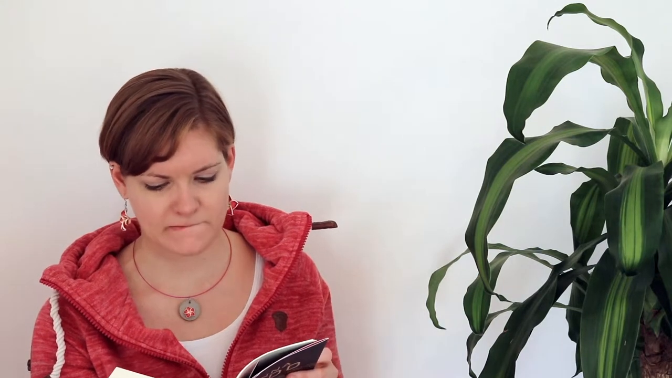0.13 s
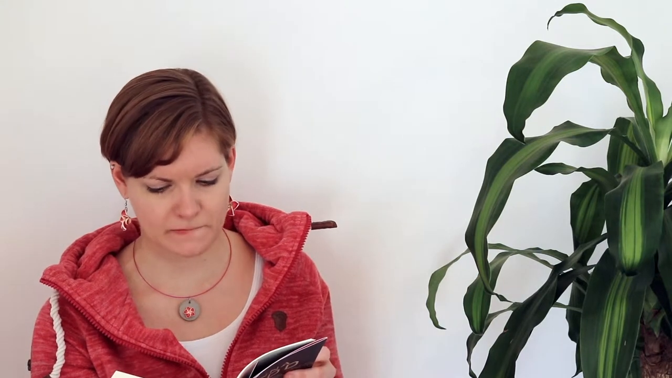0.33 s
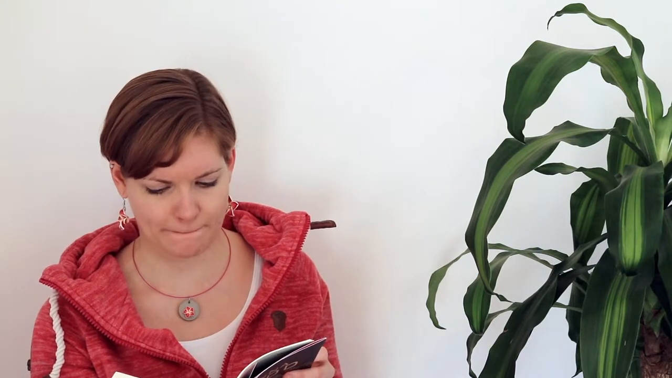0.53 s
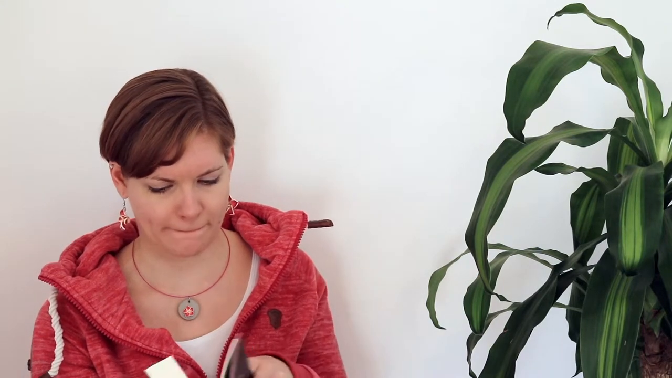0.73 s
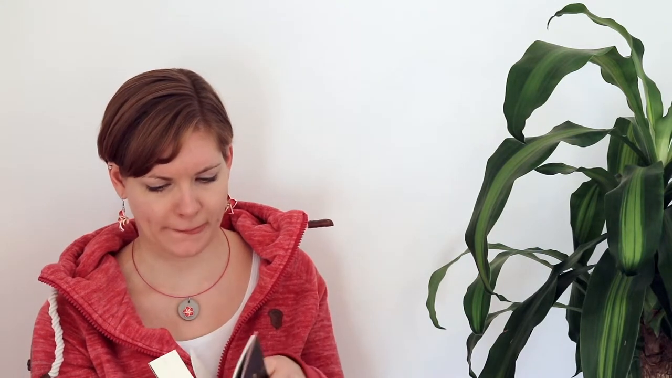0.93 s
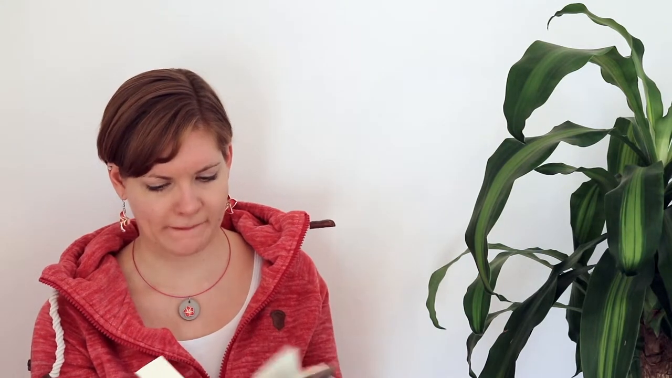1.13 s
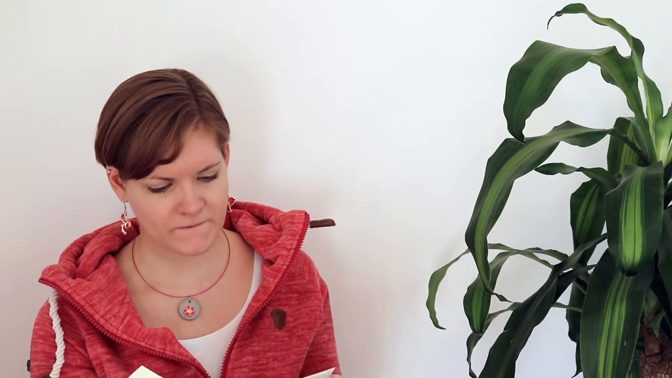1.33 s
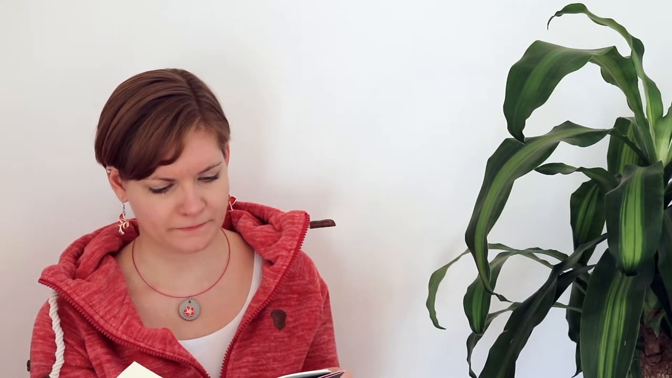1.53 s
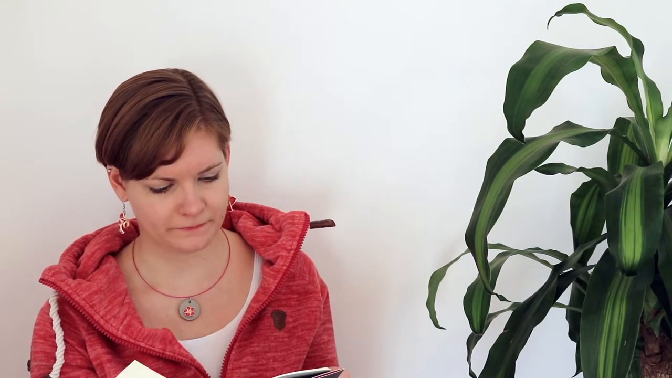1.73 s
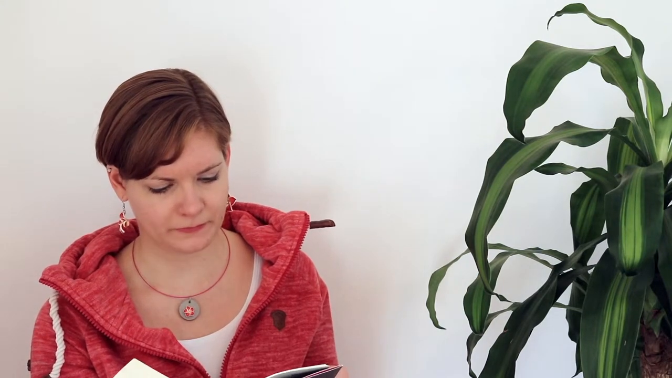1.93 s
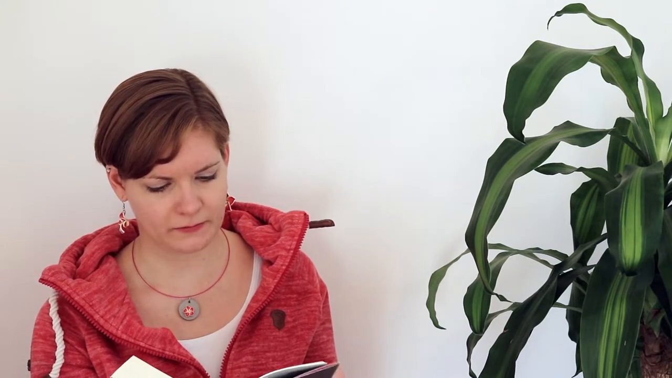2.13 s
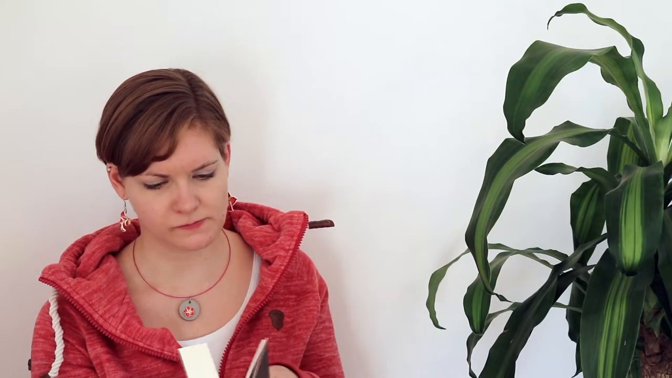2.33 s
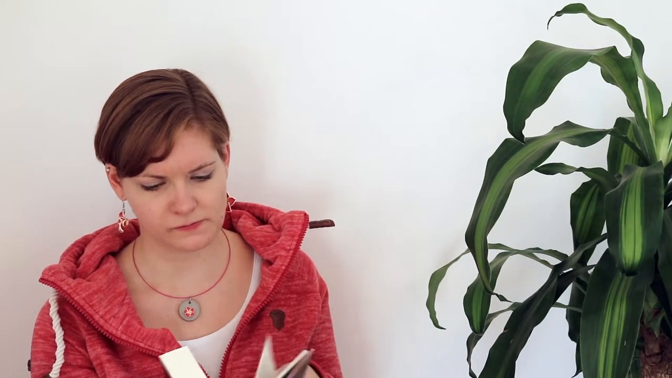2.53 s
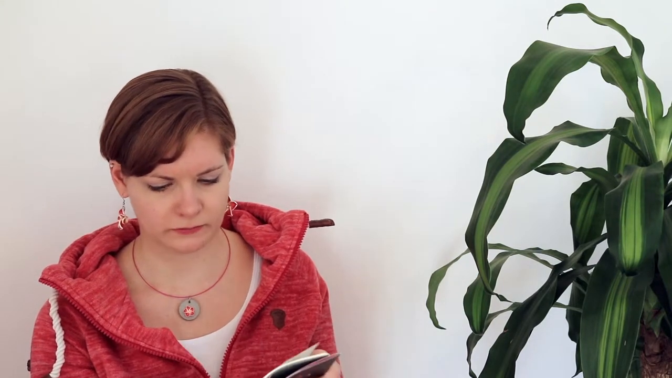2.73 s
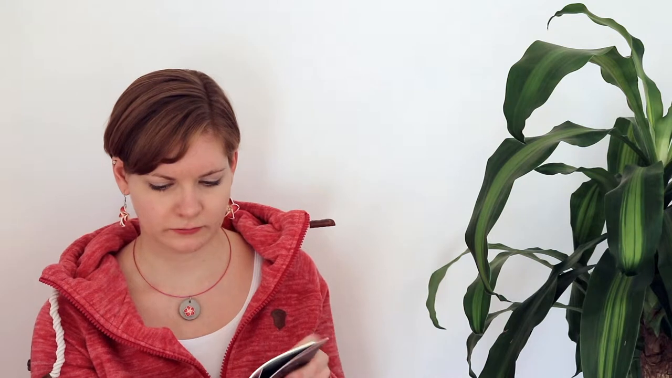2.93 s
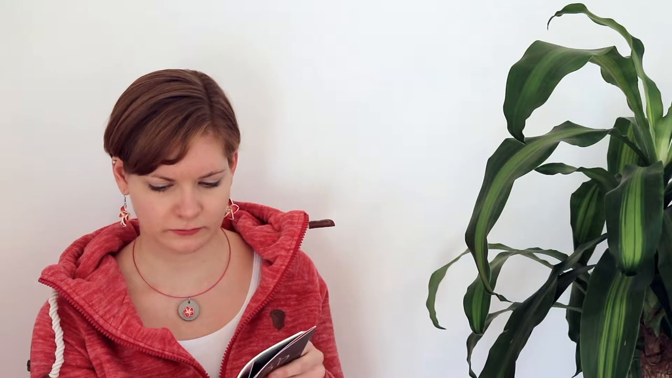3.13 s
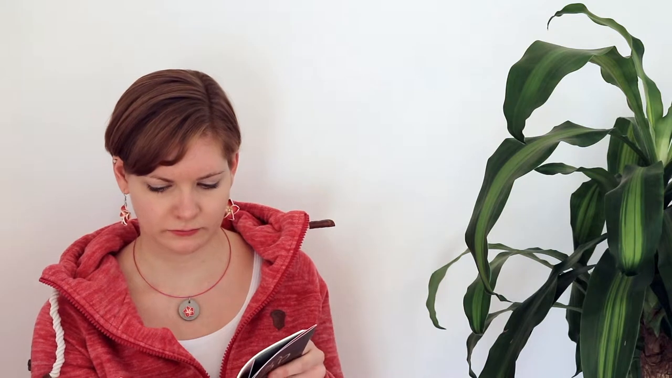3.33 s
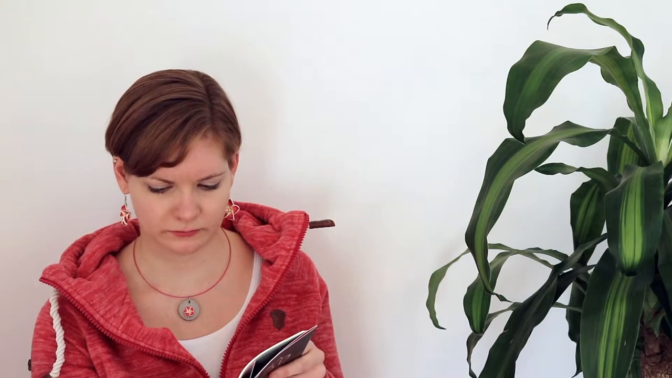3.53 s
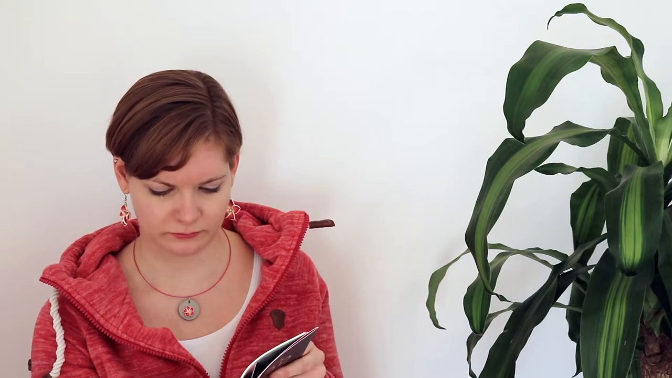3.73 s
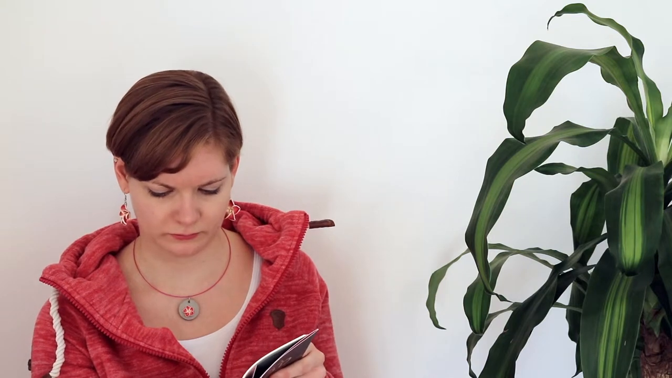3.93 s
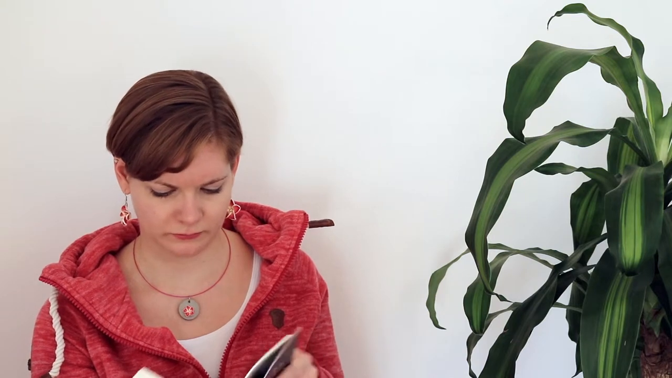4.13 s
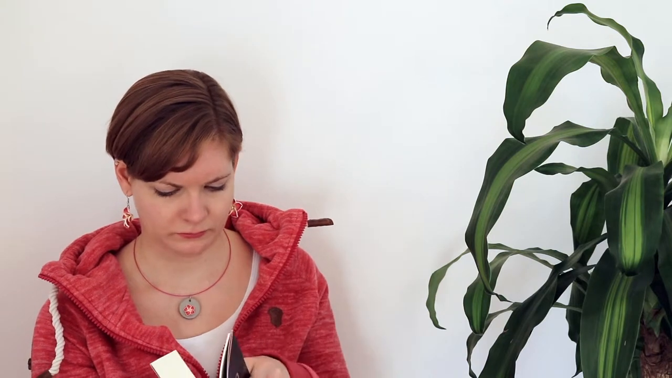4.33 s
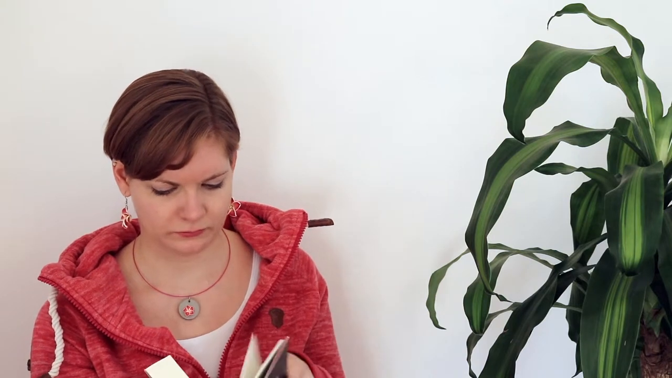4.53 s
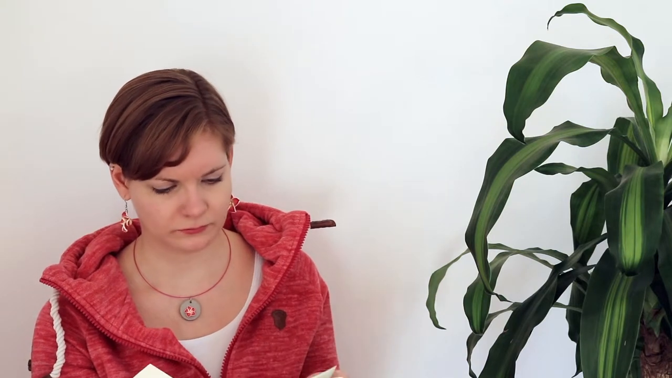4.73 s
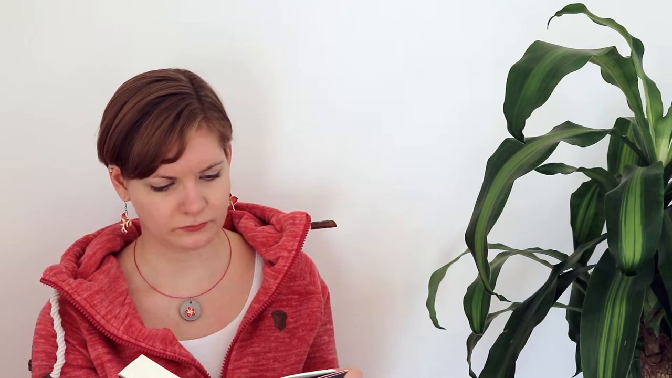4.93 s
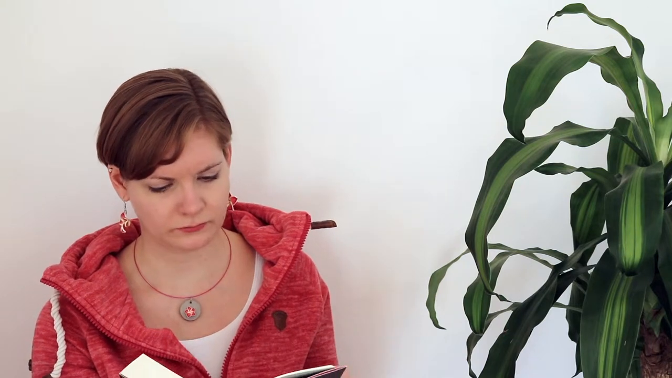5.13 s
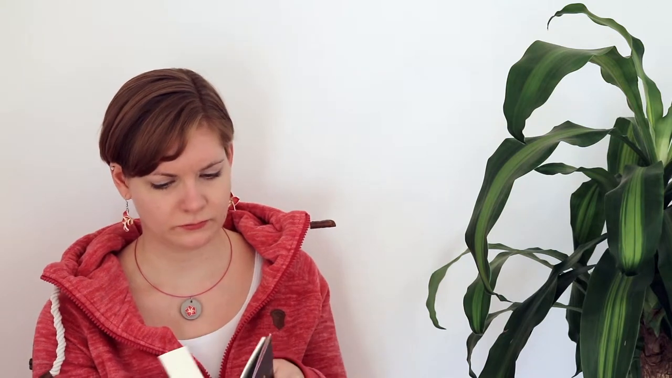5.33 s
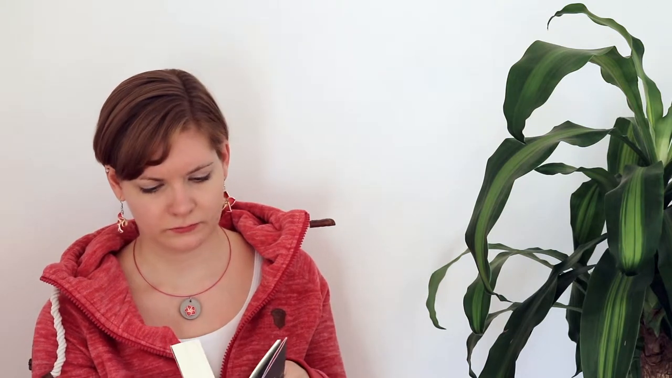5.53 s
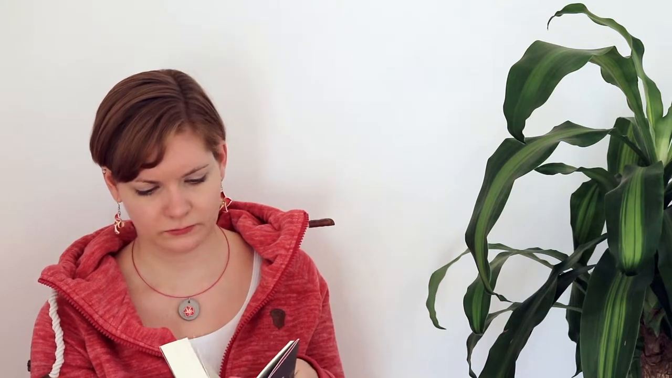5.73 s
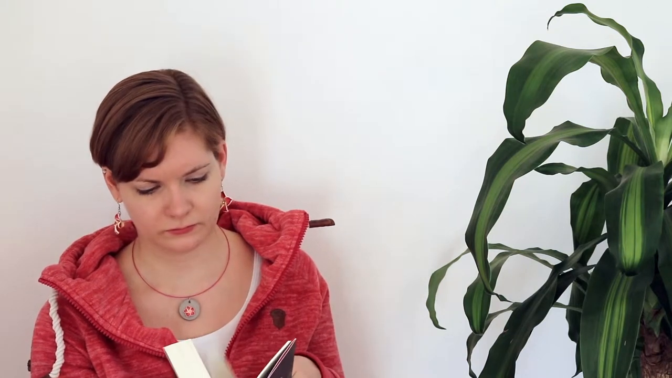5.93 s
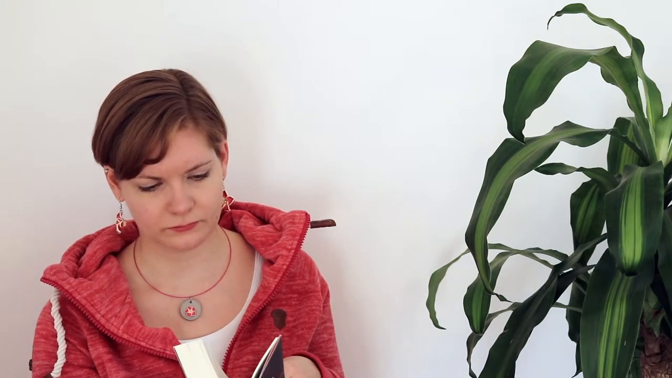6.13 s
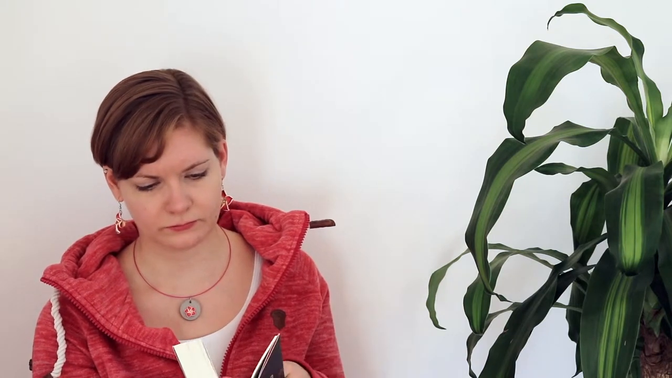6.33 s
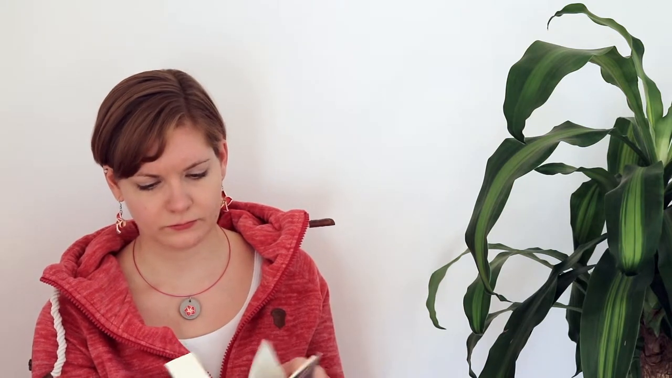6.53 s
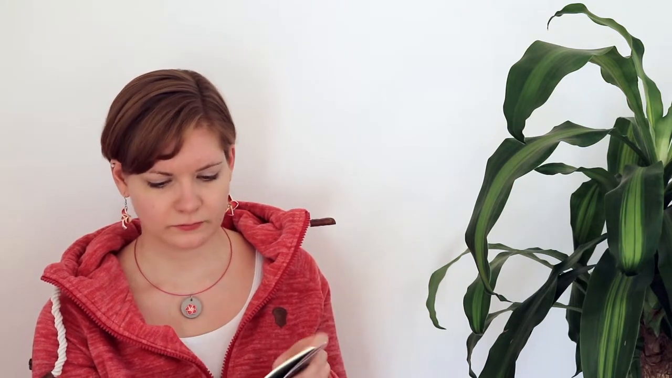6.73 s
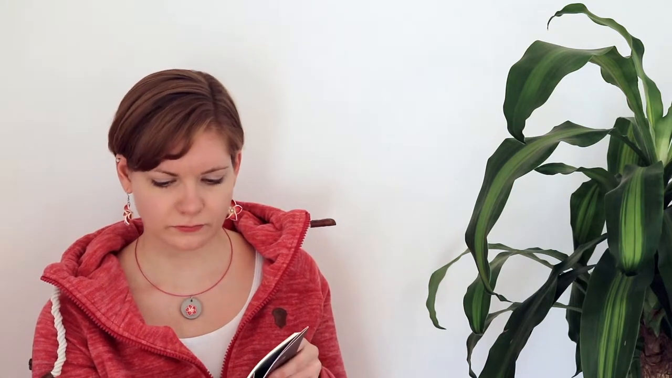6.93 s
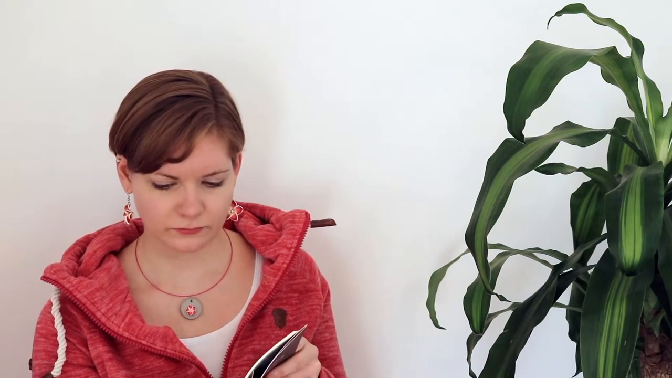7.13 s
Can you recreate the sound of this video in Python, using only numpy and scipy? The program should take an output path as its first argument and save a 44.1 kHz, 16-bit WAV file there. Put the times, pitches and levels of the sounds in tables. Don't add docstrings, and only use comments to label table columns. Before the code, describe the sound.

A small quiet room, with a paperback handled about a metre from a stereo microphone and leaning slightly left. Faint hiss alone at first, then a light flick and brush around 0.7 seconds. From 1.0 to 1.6 a busy bout of crisp edge flicks, dry scraping and thin airy swishes. After a near-silent gap, a faint brush at 2.2 leads to a denser, louder flurry from 2.5 to 2.95, ending as pages settle brightly. A pause follows until soft drags at 4.2, then stronger rustles and a long airy swish between 4.5 and 4.9. A small light rustle comes at 5.3. Near 6.03 the stiff cover gives one sharp, dry snap with a brief woody ring, followed by small flicks. A final crisp flurry at 6.5 to 6.8 ends in a swish. Dull taps lie faintly beneath; hiss lifts with each movement and sinks slowly until about 7.1.

```python
import sys
import numpy as np
from scipy import signal
from scipy.fft import rfft, irfft, next_fast_len
from scipy.io import wavfile
from scipy.ndimage import uniform_filter1d

SR = 44100
rng = np.random.default_rng(int(sys.argv[2]) if len(sys.argv) > 2 else 0)


def elevation(decibels):
    levels = np.asarray(decibels, float)
    return 10 ** (levels / 20)


def digitize_waveform(pressure):
    field = np.atleast_2d(pressure).T
    bounded = np.clip(field, -1, 1)
    quanta = np.round(bounded * 32767).astype(np.int16)
    wavfile.write(sys.argv[1], SR, quanta)


N = 315742

# low_hz, high_hz
RUSTLE_BANDS = [
    (1500, 4100),
    (4500, 7500),
    (7500, 11000),
    (11000, 15900),
    (420, 1100),
]
# start_s, hold_s, scrape_db, body_over_scrape_db, air_over_scrape_db
CATCHES = [(0.671, .005, -74, 9.5, -7), (1.066, 0.0048, -53.5, -16, 0), (1.468, .016, -53.5, -4, 8),
           (1.544, .002, -56.5, -8, -3), (2.275, .03, -59, -4.5, -3.5), (2.535, 0.0057, -55, -8, -10),
           (2.564, 0.021, -42.5, -5, -8), (2.677, .025, -42, -8.5, -7), (2.844, .006, -63.5, 8.5, -14),
           (4.506, 0.0057, -62, -2, -6), (4.543, .018, -42, -9, -5.5), (4.753, .004, -44.5, -2, -2),
           (5.296, .012, -62.5, 0, 9.5), (5.343, .008, -61.5, -1.5, -10), (5.811, 0.018, -80, 12, -12),
           (6.033, .004, -51.5, 12, -45), (6.051, .002, -49, 3.5, -14.5), (6.158, .006, -50.5, -5, -5.5),
           (6.497, .006, -49, -20, 5), (6.506, .004, -39.5, -1.5, -3), (6.595, .01, -51.5, -9, -21)]
# start_s, hold_s, scrape_db, body_over_scrape_db, air_over_scrape_db
DRAGS = [(0.743, .025, -68.5, -0.5, -16), (0.803, 0.082, -76.5, 4.5, -15), (1.03, .004, -63.5, -2.5, -6),
         (1.09, 0.013, -45, -7.5, -15), (1.195, 0.073, -44.5, -7, -11.5), (1.328, .04, -61, -1.5, -11),
         (1.415, 0.043, -61, -2, -5), (2.244, 0.0038, -77.5, 6, -15), (2.664, 0.0077, -50, -2, -23),
         (4.186, .02, -68, 4, -10), (4.226, 0.023, -55.5, -5, -9.5), (4.307, 0.066, -73.5, 4.5, -15),
         (4.674, 0.022, -46.5, -4.5, -12.5), (4.734, .01, -45.5, -8, -1.5), (5.28, .01, -67.5, 5.5, -1),
         (5.975, 0.021, -75, 1, -8), (6.074, .02, -73, 15, -25), (6.476, .015, -61, -11, -13),
         (6.619, 0.054, -42.5, -9, -15), (6.69, 0.029, -46.5, 0.5, -13)]
# start_s, hold_s, scrape_db, body_over_scrape_db, air_over_scrape_db
SWISHES = [
    (1.26, .016, -55, -8, 7.5),
    (1.498, 0.043, -63.5, 2.5, 14.5),
    (2.15, .004, -85, -5, 3),
    (2.739, .02, -53, -4.5, 1),
    (2.885, .02, -58, -1, 4.5),
    (2.924, .02, -54.5, -4, 10),
    (4.802, .01, -53, -7, -1),
    (4.853, 0.033, -58.5, -2, 15),
    (6.752, .04, -49.5, -9, 6),
]
# rise_db_per_s, fall_db_per_s, sheen_over_scrape_db
CATCH_SHAPE = (2800, 396, -1.1)
DRAG_SHAPE = (530, 480, -3)
SWISH_SHAPE = (350, 410, -1)
BODY_LINGER, SHEEN_LINGER, AIR_LINGER = 1.27, 0.81, 0.64
SHEEN_SHARE = 0.41
SETTLE_DB, SETTLE_DB_PER_S = -31, 108
PUFF_DB = -18.5

# start_s, pitch_hz, over_scrape_db
SHEET_BENDS = [(0.76, 5400, 8), (1.105, 12500, 10), (1.113, 3400, 18.5), (1.176, 5200, 14),
               (1.184, 6550, 11), (1.191, 8270, 11.5), (1.196, 9700, 17), (1.199, 12500, 19),
               (1.454, 12600, 10), (1.457, 5430, 12), (1.536, 5400, 19), (2.306, 2330, 9),
               (2.55, 8500, 11.5), (2.553, 13400, 21), (2.593, 5940, 10), (2.597, 3630, 19.5),
               (2.611, 7240, 12), (2.674, 12600, 15), (2.737, 10160, 14), (2.744, 13440, 16),
               (4.536, 13800, 14), (4.721, 5000, 9), (4.767, 2490, 6.5), (4.82, 11000, 12),
               (5.289, 13900, 17), (6.043, 1670, 15.5), (6.156, 7200, 7), (6.49, 5460, 8), (6.584, 5150, 9),
               (6.64, 10000, 16)]
# start_s, pitch_hz, over_scrape_db
MORE_BENDS = [(1.07, 9200, 9), (1.21, 3670, 8), (1.24, 5100, 3), (1.38, 5460, 5), (2.575, 2390, 10),
              (4.55, 3400, 12.5), (4.66, 5200, 2), (6.06, 3710, 10.5), (6.08, 1740, 14), (6.465, 6140, 11),
              (6.64, 5200, 3.5), (6.7, 2100, 0), (2.845, 1500, 8.5)]
# pitch_hz, over_scrape_db
PAGE_MODES = [(2420, 5), (3400, 8.5), (5150, 7.5), (5950, 4), (6600, 5.5), (7300, 4.5), (8200, 2.5),
              (10000, 5.5), (11250, 3.5), (12800, 9.5), (13900, 6), (14700, 6)]
BEND_WIDTH_HZ, BEND_RISE_S, BEND_FALL_S, BEND_LEAD_S = 240, 0.022, 0.061, 0.03
PAGE_SCATTER_DB, STRAY_DB, LIFT_DB = 2.5, 4, 6

# start_s, peak_db, pitch_hz, t60_s
FLICKS = [(0.6669, -55, 3640, 0.033), (1.0344, -48, 7170, 0.03), (1.063, -25, 9300, 0.038),
          (1.0879, -21.5, 5460, 0.028), (1.1872, -22, 5140, 0.056), (1.2014, -22, 5070, 0.03),
          (1.4671, -43, 11100, 0.03), (1.5434, -29, 9600, 0.037), (2.2747, -43, 6320, 0.03),
          (2.5361, -43, 4640, 0.03), (2.5591, -23, 8380, 0.025), (2.5716, -18.5, 5300, 0.023),
          (2.5864, -26, 3660, 0.023), (2.6768, -23, 8400, 0.059), (2.6894, -27, 6540, 0.03),
          (2.8414, -25, 2370, 0.03), (4.5101, -42, 3150, 0.049), (4.5446, -29, 7480, 0.03),
          (4.5516, -29, 7150, 0.03), (4.7494, -33, 4750, 0.026), (5.8112, -47, 3120, 0.03),
          (6.0534, -28, 1740, 0.022), (6.1584, -27, 7900, 0.1), (6.5076, -20, 3700, 0.019),
          (6.5214, -25, 2410, 0.023), (6.5939, -34, 5100, 0.03), (6.6149, -26, 3400, 0.03),
          (6.634, -26, 10100, 0.1), (6.658, -22, 9900, 0.1), (6.6957, -18, 2300, 0.034)]
# start_s, peak_db, pitch_hz, t60_s
TAPS = [(0.667, -49, 1010, 0.058), (0.845, -56.5, 577, 0.096), (1.084, -46, 1040, 0.07),
        (2.306, -63, 937, 0.076), (2.375, -49, 540, 0.053), (2.6, -47, 940, 0.13),
        (4.313, -43.5, 560, 0.084), (4.749, -39.5, 1034, 0.19), (5.811, -51, 506, 0.1),
        (6.008, -44.5, 313, 0.082), (6.027, -40.5, 565, 0.25), (6.509, -37, 700, 0.14),
        (6.697, -39, 964, 0.12)]
TAP_DB = -4.5
# start_s, peak_db, pitch_hz, t60_s
COVER_MODES = [
    (6.0128, -38.5, 2480, 0.029),
    (6.019, -43, 3620, 0.046),
    (6.0305, -23, 1566, 0.052),
    (6.0286, -38, 3430, 0.02),
    (6.0282, -31, 5130, 0.0089),
    (6.0286, -31, 6580, 0.023),
    (6.0302, -32, 5870, 0.0095),
    (6.0366, -29, 1730, 0.025),
]
# start_s, peak_db, pitch_hz, half_length_s
CRACK = (6.02925, -14.3, 2300, .0004)

# time_s, left_minus_right_db
SWAY = [(0.0, 0.0), (1.65, 2), (2.0, 2), (2.3, 2.5), (3.0, 0.5), (3.6, 3), (4.6, 2), (5.3, 2.5), (5.7, 0.5),
        (7.16, 1.5)]
ROOM_T60_S, ROOM_DB = 0.17, -9.5

# frequency_hz, density_db
HISS_SPECTRUM = [(15, -63), (25, -42), (70, -20.5), (107, -12), (165, -8.5), (189, -2), (228, -5.5),
                 (284, -1), (316, -1), (1090, -3.5), (1390, -6), (1510, -5.5), (15800, -16.5)]
HISS_DB = -69.5
GATE_OPEN_DB, GATE_RANGE_DB, GATE_SLOPE = -63.5, 9, 0.49
GATE_RISE_PER_S, GATE_FALL_DB_PER_S = 46, 15.5
TREBLE_LEFT_DB, TOP_HZ = 1, 15800


def rustle():
    t = np.arange(-4000, 12000) / SR
    slips = rng.standard_normal(N)
    rush_db = 1.36 * rng.exponential(size=N) + 3.06 * flutter(200)
    sheets = bent_sheets(unit(slips * elevation(rush_db)))
    parts = np.array([band(sheets, lo, hi) for lo, hi in RUSTLE_BANDS])
    parts = parts / np.sqrt(uniform_filter1d(parts ** 2, size=2205, axis=1))
    power = np.zeros((len(RUSTLE_BANDS), N))
    lingers = (BODY_LINGER, 1, SHEEN_LINGER, AIR_LINGER, BODY_LINGER)
    kinds = ((CATCH_SHAPE, CATCHES), (DRAG_SHAPE, DRAGS), (SWISH_SHAPE, SWISHES))
    for (rise, fall, sheen), strokes in kinds:
        for start_s, hold_s, scrape_db, body, air in strokes:
            after = (t - hold_s).clip(0)
            swell_db = scrape_db + rise * t.clip(max=0)
            settling = elevation(SETTLE_DB - SETTLE_DB_PER_S * after)
            over_scrape = (body, 0, sheen + SHEEN_SHARE * air, air, body + PUFF_DB)
            for row, over_db, linger in zip(power, over_scrape, lingers):
                envelope = elevation(swell_db + over_db) * (elevation(-fall * after / linger) + settling)
                add(row, start_s + t[0], envelope ** 2)
    return np.sum(parts * np.sqrt(power), axis=0)


def bent_sheets(slips):
    usual, stray = [], []
    for start_s, hold_s, *_ in [*CATCHES, *DRAGS, *SWISHES]:
        lead_s = start_s - BEND_LEAD_S
        page_chances, stray_chances = rng.random((2, 5, 3))
        for when, which, level in page_chances[:2]:
            hz, db = PAGE_MODES[int(which * len(PAGE_MODES))]
            usual.append((lead_s + hold_s * when, hz, db + PAGE_SCATTER_DB * (2 * level - 1)))
        for when, pitch, level in stray_chances:
            stray.append((lead_s + (hold_s + 0.06) * when, 1545 + 13400 * pitch, STRAY_DB * level))
    t = np.arange(-4000, 8000) / SR
    bend = np.exp(-np.where(t < 0, t / BEND_RISE_S, t / BEND_FALL_S) ** 2)
    clumps = slips * unit(elevation(2.8 * flutter(70)))
    out = band(slips, 2300, 13000, order=1)
    for start_s, hz, db in [*SHEET_BENDS, *MORE_BENDS, *usual, *stray]:
        pick = rng.integers(N - len(t))
        drive = bend * clumps[pick:pick + len(t)]
        b, a = signal.iirpeak(hz, hz / BEND_WIDTH_HZ, SR)
        add(out, start_s + t[0], elevation(db + LIFT_DB) * signal.lfilter(b, a, drive))
    return out


def edge_flicks():
    out = np.zeros(N)
    for start_s, db, hz, t60 in FLICKS:
        add(out, start_s, elevation(db - 10.5) * ring_cluster(hz, t60, 900 / hz))
    return out


def block_taps():
    out = np.zeros(N)
    for start_s, db, hz, t60 in TAPS:
        tick = 0.6 * ring_cluster(2100, 0.012, 0.7)
        tone = 0.8 * ring(hz, t60 / 2)
        thud = 0.6 * ring_cluster(hz, t60, 0.25)
        add(out, start_s, elevation(db + TAP_DB) * (tone + thud + tick))
    return out


def cover_snap():
    ringing = np.zeros(N)
    for start_s, db, hz, t60 in COVER_MODES:
        add(ringing, start_s, elevation(db) * ring(hz, t60))
    start_s, db, hz, half_length_s = CRACK
    t = np.arange(N) / SR - start_s
    crack = elevation(db) * np.cos(2 * np.pi * hz * t) * np.exp(-(t / half_length_s) ** 2)
    crack = shaped(crack, lambda f: 1 / (1 + (1350 / f) ** 8))
    return band(ringing, 1760, 6550) + crack


def room(book):
    t = np.arange(16384) / SR
    tail = rng.standard_normal((2, len(t))) * elevation(-60 * t / ROOM_T60_S)
    tail = elevation(ROOM_DB) * unit(tail * (t > 0.004))
    scatter = rng.standard_normal((2, len(t))) * elevation(-60 * t / 0.012)
    scatter = elevation(-11.5) * unit(band(scatter, 10500, 21500, order=1))
    return signal.fftconvolve(book, (tail + scatter) / np.sqrt(len(t)), axes=1)[:, :N]


def hiss():
    hz, db = np.transpose(HISS_SPECTRUM)

    def spectrum(f):
        return elevation(np.interp(np.log(f), np.log(hz), db)) / (1 + (f / 19000) ** 2)

    mid, side = shaped(rng.standard_normal((2, N)), spectrum)
    return elevation(HISS_DB) * (unit(mid) + elevation(-2.0) * unit(side) * np.array([[1], [-1]]))


def gate_opening(want_db, rise, fall):
    sunk = fall * np.arange(len(want_db))
    held_db = np.maximum.accumulate(want_db + sunk) - sunk
    return signal.lfilter([rise], [1, rise - 1], held_db)


def unit(x):
    return x / np.sqrt(np.mean(x ** 2))


def band(x, lo_hz, hi_hz, order=4):
    return signal.sosfilt(signal.butter(order, [lo_hz, hi_hz], "bandpass", fs=SR, output="sos"), x)


def shaped(x, gain):
    size = next_fast_len(N)
    f = np.fft.rfftfreq(size, 1 / SR) + 1
    return irfft(rfft(x, size) * gain(f), size)[..., :N]


def flutter(rate_hz):
    k = int(SR / rate_hz)
    return uniform_filter1d(np.repeat(rng.standard_normal(N // k + 1), k), k)[:N]


def ring(hz, t60):
    t = np.arange(4096) / SR
    return decayed(np.sin(2 * np.pi * hz * t) * np.minimum(t * hz * 2, 1), t60)


def ring_cluster(hz, t60, spread):
    burst = rng.standard_normal(4096)
    return decayed(band(burst, hz / (1 + spread), min(hz * (1 + spread), 16000), order=2), t60)


def decayed(wave, t60):
    wave = wave * elevation(-60 * np.arange(len(wave)) / SR / t60)
    return wave / np.abs(wave).max()


def add(out, start_s, wave):
    i = int(start_s * SR)
    out[i:i + len(wave)] += wave[:N - i]


def scene():
    sway_db = np.interp(np.arange(N) / SR, *np.transpose(SWAY))
    book = rustle() + edge_flicks() + block_taps() + cover_snap()
    book = band(book, 170, 18000, order=2) * elevation(np.array([sway_db, -sway_db]) / 2)
    book = book + room(book)
    power = uniform_filter1d(np.mean(book ** 2, axis=0), size=441)
    level_db = 10 * np.log10(power.clip(1e-14))
    want_db = np.clip(GATE_SLOPE * (level_db - GATE_OPEN_DB), 0, GATE_RANGE_DB)
    gate_db = gate_opening(want_db, GATE_RISE_PER_S / SR, GATE_FALL_DB_PER_S / SR)
    return book + hiss() * elevation(gate_db)


def low_pass(x):
    return signal.sosfilt(signal.butter(12, 15990, fs=SR, output="sos"), x)


def record(dry):
    def response(f):
        tilt_db = TREBLE_LEFT_DB * np.array([[0.5], [-0.5]]) / (1 + (10000 / f) ** 4)
        return elevation(tilt_db) / (1 + (f / TOP_HZ) ** 120)

    mix = shaped(dry, response)
    return low_pass(mix)


dry = scene()
out = record(dry)
digitize_waveform(out)
```